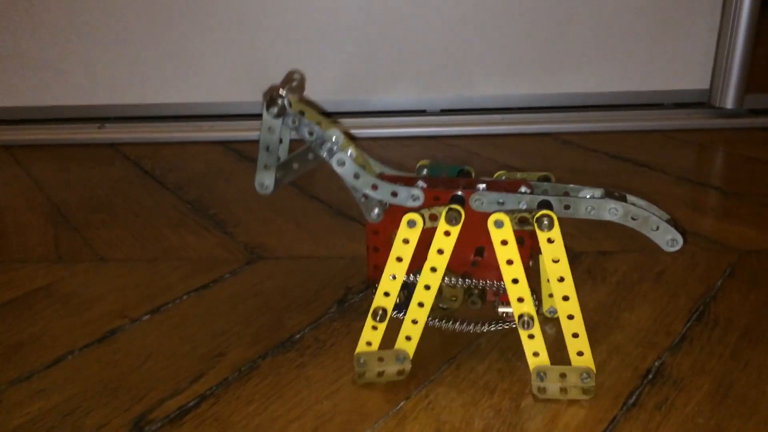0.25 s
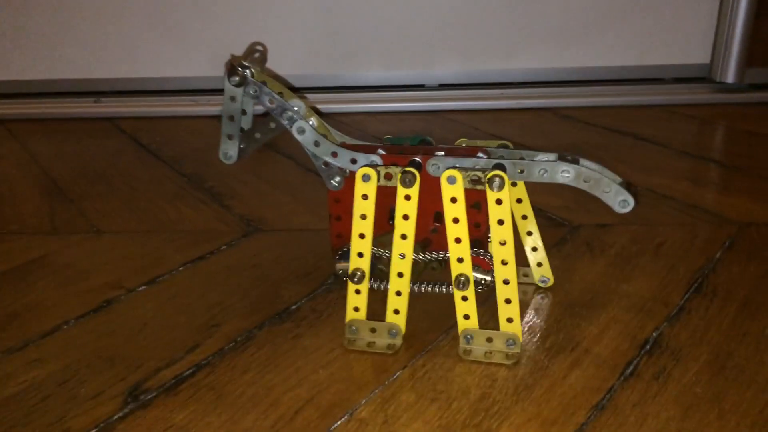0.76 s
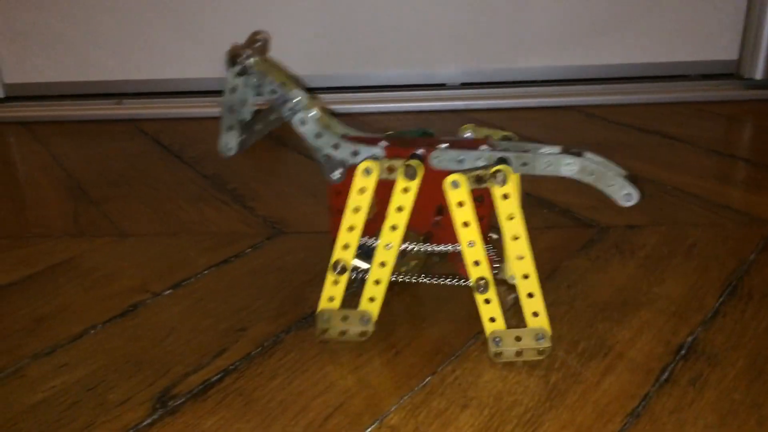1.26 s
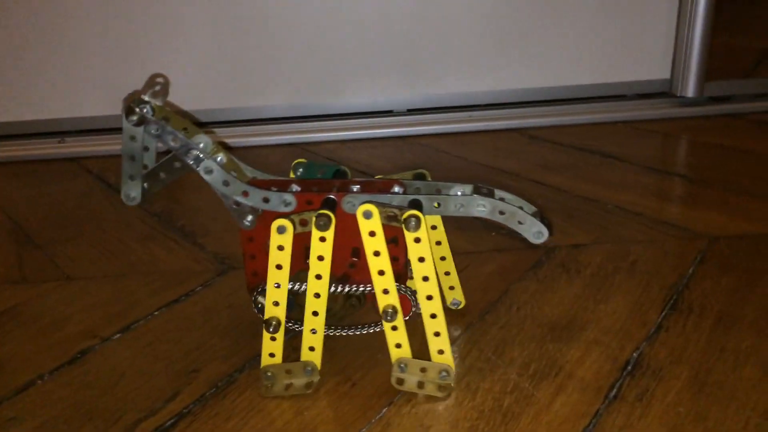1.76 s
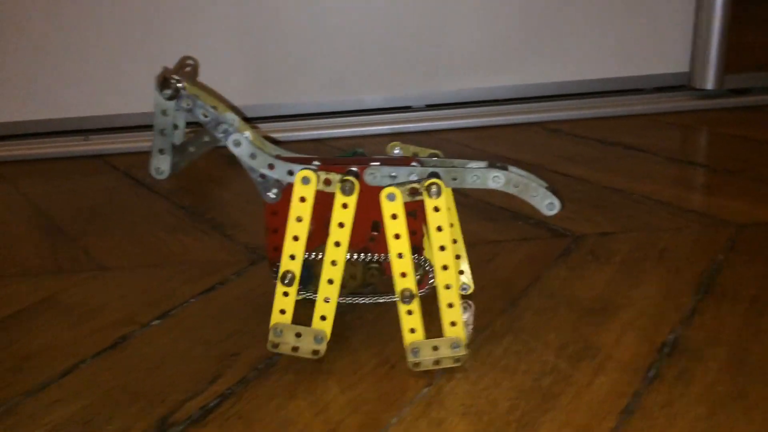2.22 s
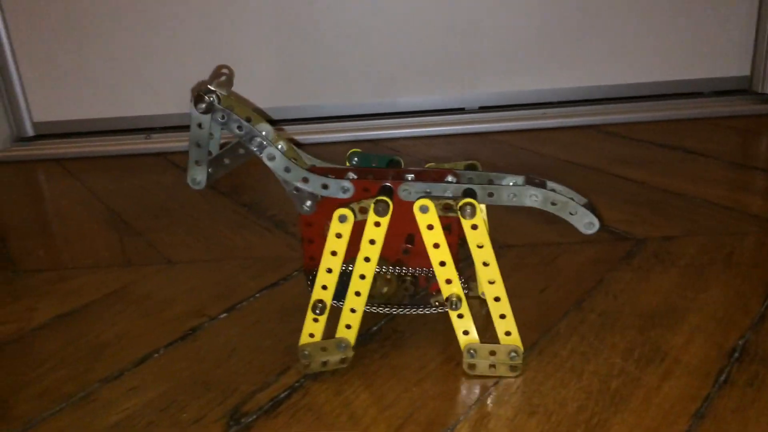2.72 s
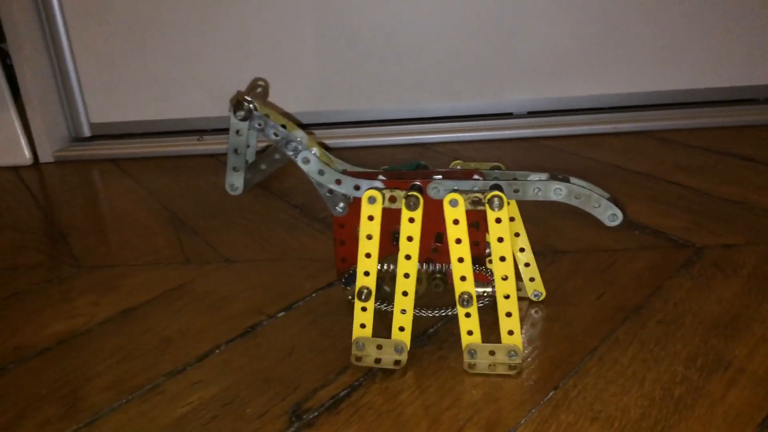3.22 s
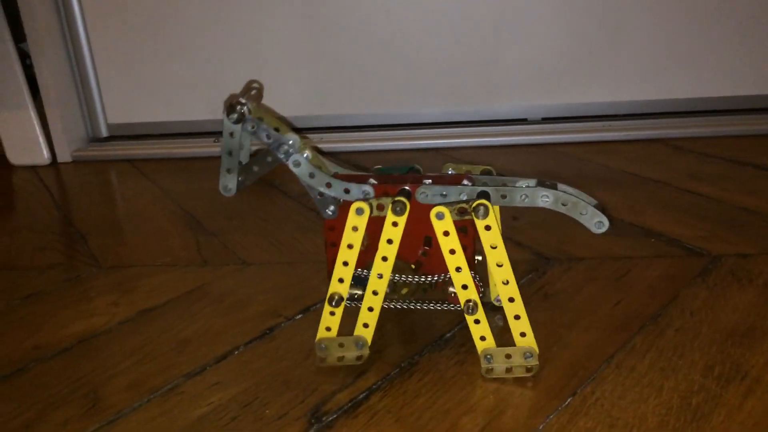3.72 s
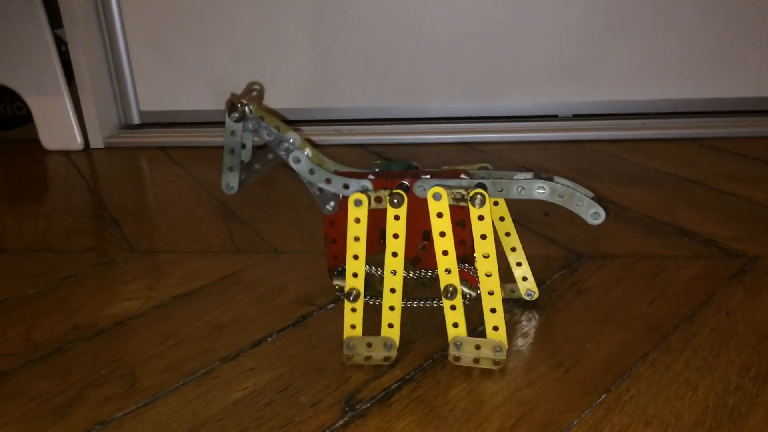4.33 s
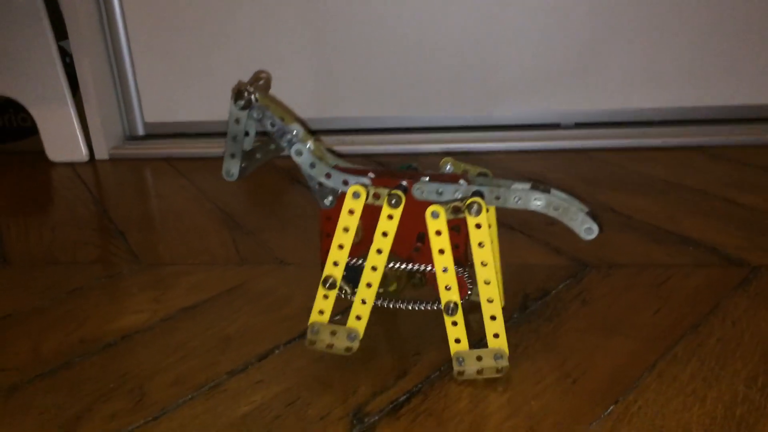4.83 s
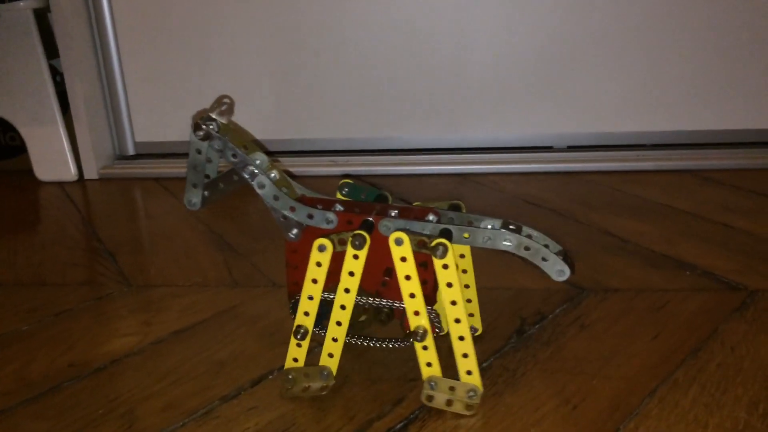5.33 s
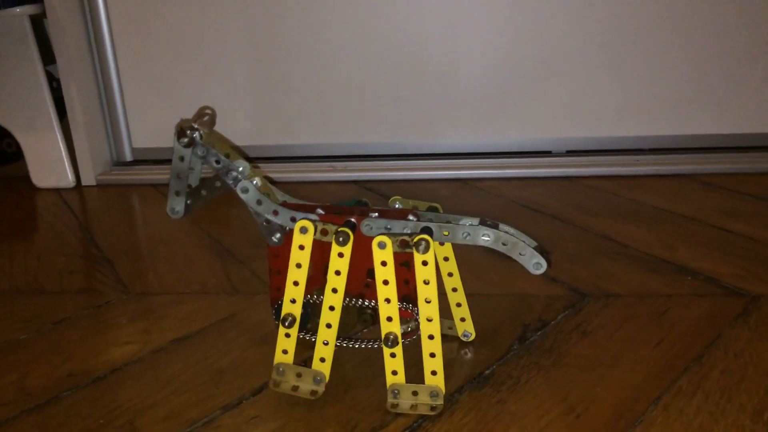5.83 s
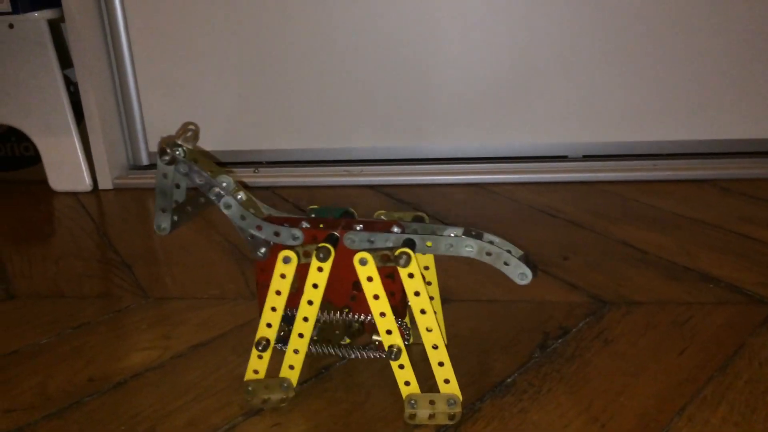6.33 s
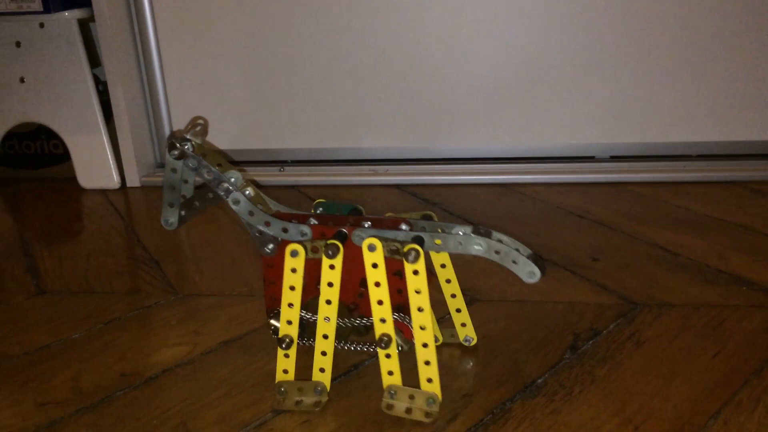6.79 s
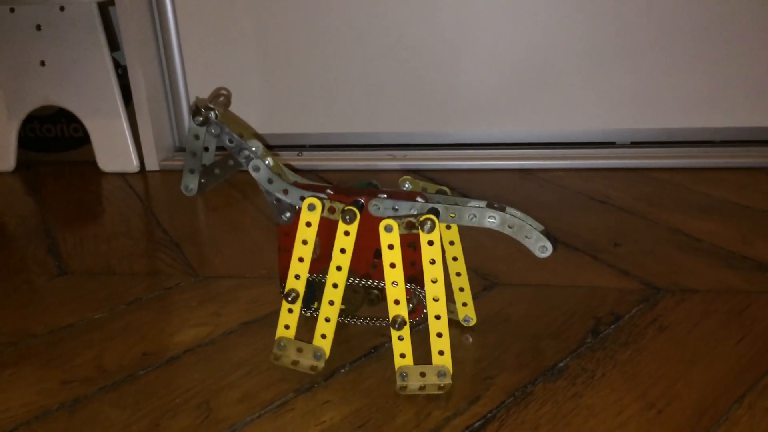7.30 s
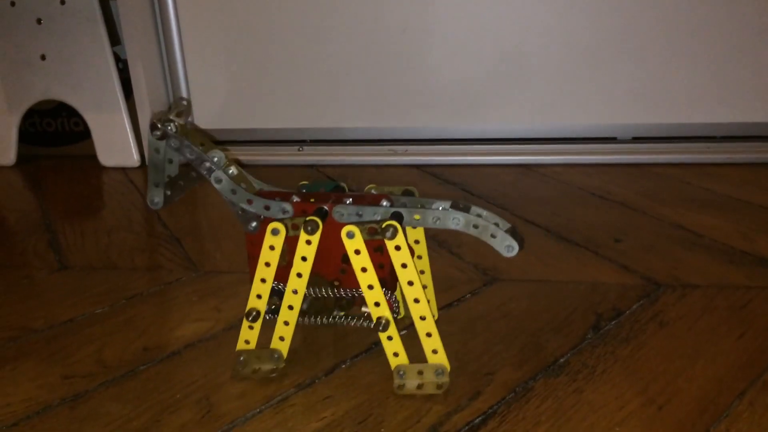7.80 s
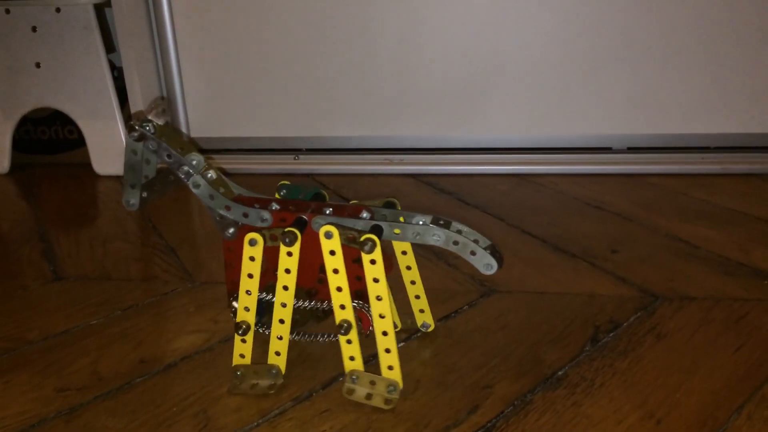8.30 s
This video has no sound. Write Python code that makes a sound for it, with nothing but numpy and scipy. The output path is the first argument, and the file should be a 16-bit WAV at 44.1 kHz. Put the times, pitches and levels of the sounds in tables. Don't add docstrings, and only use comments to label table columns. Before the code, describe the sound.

A wind-up walker of perforated metal strips buzzes and rattles across a wooden floor, paired feet knocking steadily, until its motor nearly stalls into ticks.

```python
import sys
import numpy as np
from scipy import signal
from scipy.fft import rfft, irfft
from scipy.io import wavfile
from scipy.ndimage import uniform_filter1d

SR = 44100
rng = np.random.default_rng(int(sys.argv[2]) if len(sys.argv) > 2 else 0)


def wav_out(sig):
    wavfile.write(sys.argv[1], SR, np.round(np.clip(np.atleast_2d(sig).T, -1, 1) * 32767).astype(np.int16))


def boost_factor(decibels):
    exponent = np.asarray(decibels, float) / 20
    return 10 ** exponent


N = 377055

# landing_s, top_speed_hz, rattle_db, hum_db, hum_lead_s (how long before landing the hum peaks)
STRIDES = [(0.44, 99.4, -32.5, -26, .1), (0.99, 102, -32.5, -25.5, .2), (1.62, 103, -31.5, -28.5, .25),
           (2.17, 98.4, -32, -27, .25), (2.83, 96.1, -33.5, -29, .25), (3.38, 96.4, -33.5, -27.5, .25),
           (4.05, 90.1, -32.5, -28, .25), (4.6, 90, -33, -29, .25), (5.29, 92.2, -33.5, -27.5, .2),
           (5.88, 90.7, -33, -27, .24), (6.57, 91, -33.3, -28, .24), (7.17, 87, -34.5, -32, .15),
           (8.03, 88.5, -33.5, -35, .1), (8.7, 88, -35, -33, .1)]
# slowest_s, speed_hz, rattle_db, hum_db
SLUMPS = [(-0.03, 79, -37, -40), (0.56, 84.8, -37.5, -33.5), (1.16, 84, -38.5, -41), (1.72, 84, -38, -35),
          (2.34, 83.2, -40, -38), (2.96, 80.4, -41, -36), (3.6, 78.5, -41.5, -39), (4.19, 79, -41, -39),
          (4.92, 79.2, -42, -43), (5.43, 81, -43, -40), (6.1, 77, -43, -50), (6.73, 77.4, -42.5, -47),
          (7.38, 82.8, -52, -48), (7.53, 68, -62, -68), (7.76, 64, -46.5, -60), (8.19, 63.8, -54, -70),
          (8.31, 66, -51, -62), (8.38, 69, -45, -56), (8.45, 73, -40.5, -48)]
# time_s, leg_strips_db, second_order_db, side_plates_db, low_hiss_db
HEADING = [(0.0, -47, -38, 0.0, 3.0), (0.8, -48, -40, 0.0, .5), (2.0, -47, -40, 1.5, 1.5),
           (2.9, -53, -41, -1.5, 0.0), (4.0, -48, -37, -.7, 1.0), (4.6, -43, -39, 1.0, -.5),
           (6.3, -42, -30.5, 2.5, -1.0), (7.2, -43, -33, 1.2, -2.0), (8.55, -41, -36, 0.0, -1.0)]
# start_s, peak_db
SLIPS = [(3.043, -22), (3.1236, -20), (3.6321, -20), (3.6896, -28), (3.75, -19), (4.2044, -24),
         (4.4514, -20), (4.9032, -17), (4.9595, -20), (6.0327, -15.5), (6.0839, -25), (6.1619, -21),
         (6.2005, -17), (6.6653, -21), (6.7156, -19), (6.774, -15.5), (6.8576, -19.5)]
# start_s, peak_db, brightness_db
TICKS = [(7.2401, -16.5, -0.5), (7.2774, -22, -1), (7.3152, -17.5, -8), (7.3382, -23, -1),
         (7.3464, -12.5, -4), (7.4004, -23, -6), (7.4147, -21.5, -4), (7.431, -16.5, -8), (7.4684, -23, -3),
         (7.4944, -14, -5), (7.5617, -21, -4), (7.5794, -30, -3), (7.5981, -19.5, -7), (7.643, -31, -8),
         (7.6573, -16.5, -3), (7.6714, -22, -4), (7.7336, -23, -3), (8.1184, -21, -2), (8.1514, -21.5, -4),
         (8.2174, -22, -2), (8.2402, -13, -3), (8.2737, -20, -5), (8.3295, -22, -4), (8.3499, -21, -4),
         (8.393, -20, -1), (8.412, -23, -3), (8.428, -24, -3)]
FULL_RATTLE_DB = -33


def rms_one(x):
    return x / np.sqrt(np.mean(x ** 2) + 1e-20)


def in_time(rows):
    s, *columns = np.transpose(rows)
    return [np.interp(np.arange(N) / SR, s, column) for column in columns]


def drift(rate):
    step = 40
    r = np.exp(-2 * np.pi * rate * step / SR)
    noise = rng.standard_normal(N // step + 2002)
    slow = signal.lfilter([1], [1, -2 * r, r * r], noise)[2000:]
    return np.interp(np.arange(N) / step, np.arange(len(slow)), rms_one(slow))


def band(x, low_hz, high_hz):
    return signal.sosfilt(signal.butter(2, [low_hz, high_hz], "band", fs=SR, output="sos"), x)


def colour(sources, spectrum, patchy_db, rate):
    hz, level_db = np.transpose(spectrum)
    edges = hz[0] * 2 ** np.arange(0, np.log2(hz[-1] / hz[0]) + .3, 1 / 3)
    out = 0
    for k, (low, high) in enumerate(zip(edges, edges[1:])):
        mid_db = np.interp(np.log(low * high) / 2, np.log(hz), level_db)
        flicker = boost_factor(mid_db + patchy_db * drift(rate))
        out = out + flicker * band(sources[k % 2], low, high)
    return out


def resonance(x, hz, width):
    r = np.exp(-np.pi * width / SR)
    gain = (1 - r * r) / 2
    return signal.lfilter(np.array([1, 0, -1]) * gain, [1, -2 * r * np.cos(2 * np.pi * hz / SR), r * r], x)


def bursts(times, peaks, rises, lengths):
    out = np.zeros(N)
    for s, peak, rise, length in np.broadcast(times, peaks, rises, lengths):
        start = round(s * SR)
        t = np.arange(min(N - start, round(SR * length))) / SR
        swell = (1 - np.exp(-t / rise)) ** 2
        out[start:start + len(t)] += peak * swell * boost_factor(-60 * t / length)
    return out


def grains(per_s, spread_db):
    sizes = boost_factor(spread_db * np.minimum(rng.exponential(1, (2, N)), 4))
    sizes = sizes * rng.choice([-1, 1], (2, N))
    return rms_one(sizes * (rng.random((2, N)) < per_s / SR))


def joined(*envelopes, room_db):
    power = sum(e ** 2 for e in envelopes)
    r = boost_factor(-120 / (0.19 * SR))
    linger = signal.lfilter([1 - r], [1, -r], power)
    return np.sqrt(power + boost_factor(room_db) ** 2 * linger)


def cycle(*knots, early_s=0):
    s, value = np.concatenate(knots, axis=1)
    order = np.argsort(s)
    return np.interp(np.arange(N) / SR + early_s, s[order], value[order])


def effort(early_s=0):
    landing_drop_db = [6.3, 3.2]
    full_early_s, drop_s, weaker_spring_db_per_s = .135, .07, .6
    land, _, top_db, _, _ = np.transpose(STRIDES)
    slump, _, low_db, _ = np.transpose(SLUMPS)
    dropped = top_db - np.resize(landing_drop_db, len(land)) - weaker_spring_db_per_s * land
    next_low_db = low_db[np.searchsorted(slump, land[:-1])]
    dropped = np.maximum(dropped[:-1], next_low_db)
    rattle_db = cycle((slump, low_db), (land - full_early_s, top_db), (land, top_db),
                      (land[:-1] + drop_s, dropped), early_s=early_s)
    return rattle_db - FULL_RATTLE_DB


def motor():
    top_early_s, landing_loss_hz, hum_sag_db_per_s = .06, 3.0, 22
    land, top_hz, _, top_db, lead = np.transpose(STRIDES)
    slump, low_hz, _, low_db = np.transpose(SLUMPS)
    hz = cycle((slump, low_hz), (land - top_early_s, top_hz), (land, top_hz - landing_loss_hz))
    hum_db = cycle((slump, low_db), (land - lead, top_db), (land, top_db - hum_sag_db_per_s * lead))
    favour = 1 / (1 + ((hz - 85.4) / 3.3) ** 2)
    detuned_db = 21 * (1 - favour)
    return hz, hum_db, in_time(HEADING)[1] - detuned_db + .15 * effort()


def governor():
    hz, hum_db, second_db = motor()
    turn = 2 * np.pi * np.cumsum(hz * (1 + .013 * drift(10.2))) / SR
    hum = boost_factor(hum_db + 2.0 * drift(17)) * np.sin(turn)
    hum = hum + boost_factor(second_db + 2.86 * drift(15.5)) * np.sin(2 * turn + 0.87)
    return np.sqrt(2) * hum, turn


def strips(contacts):
    # pitch_hz, width_hz, level_db
    strip_tones = [(3080, 160, 6.5), (3300, 150, 5.5), (3860, 250, -1), (5820, 1400, -1), (7970, 500, -2),
                   (9760, 1500, 1), (13650, 3600, -1.5)]
    # pitch_hz, level_db (per Hz)
    rattle_spectrum = [(1600, -32), (2200, -0.5), (2700, -5), (4400, -1.5), (6600, -4), (8300, -5),
                       (9000, -4.5), (11800, -0.5), (15000, -3)]
    # edge_hz, blend_hz
    splits = [(1500, 300), (1950, 150), (2450, 250), (6950, 900), (8600, 30), (11300, 60), (15200, 120),
              (15750, 30)]
    # time_s, level_db
    flank = [(0.0, 1.0), (2.6, 1.0), (3.0, -4.0), (4.15, -4.0), (4.4, 1.5), (5.9, 1.0), (6.3, -2.0),
             (8.55, -5.0)]
    body = colour(contacts, rattle_spectrum, patchy_db=1.06, rate=24)
    whole = body + boost_factor(1.5) * resonance(body, 2227, 120)
    flank_db = in_time(flank)[0]
    for hz, width, level_db in strip_tones:
        shifting_db = level_db + 2.2 * drift(2.8) + (width < 200) * flank_db
        whole = whole + boost_factor(shifting_db) * resonance(body, hz, width)
    spectrum = rfft(whole)
    hz = np.arange(len(spectrum)) * SR / N
    above = [np.clip((hz - edge) / blend + .5, 0, 1) for edge, blend in splits]
    return [rms_one(irfft(spectrum * (low - high), N)) for low, high in zip(above, above[1:])]


def gear_levels():
    legs_db, _, plates_db, _ = in_time(HEADING)
    return (FULL_RATTLE_DB + effort(),
            legs_db + .85 * effort(),
            FULL_RATTLE_DB - .6 + plates_db + 1.3 * effort(early_s=.025),
            FULL_RATTLE_DB + 2.7 + .98 * effort(early_s=.005))


def catching():
    catch_s, hush_db = .013, 4.5
    marks, width = np.zeros(N), round(catch_s * SR)
    marks[[round((slip[0] - catch_s) * SR) for slip in SLIPS + TICKS]] = width
    smooth = uniform_filter1d(uniform_filter1d(marks, width), width)
    return -hush_db * np.minimum(width * smooth / width, 1)


def gears(turn):
    meshing_db = catching() - 1.5 + 0.91 * np.sin(turn) + 0.58 * drift(37) + 0.59 * drift(86)
    rattle, legs, plates, hiss = (boost_factor(level_db + meshing_db) for level_db in gear_levels())
    s, peak_db, bright_db = np.transpose([(*slip, -4) for slip in SLIPS] + TICKS)
    s = s - .0015
    dull = bursts(s, boost_factor(peak_db - 8), 0.002, 0.032)
    bright = bursts(s, boost_factor(peak_db + bright_db - 9), 0.0014, 0.04)
    foot_s, _, _, clank_db, _, _ = footfalls()
    clank = bursts(foot_s, boost_factor(clank_db - 8.5), 0.0028, 0.072)
    low = joined(rattle, dull, clank, room_db=-8.5)
    high = joined(hiss, bright, 0.72 * clank, room_db=-8.5)
    low_hiss_db = in_time(HEADING)[3] + 1.2 * drift(3.6)
    envelopes = [
        boost_factor(-21.5) * low,
        joined(legs, 0.32 * dull, 0.56 * clank, room_db=-4),
        low,
        joined(plates, 0.58 * bright, 0.65 * clank, room_db=-7),
        boost_factor(-4.5 + low_hiss_db) * high,
        boost_factor(-0.5) * high,
        boost_factor(-22) * high]
    ringing = strips(grains(per_s=9000, spread_db=3.5))
    return sum(envelope * sound for envelope, sound in zip(envelopes, ringing))


def shake():
    upper_db = -44 - 1.9 * np.arange(N) / SR + .3 * effort()
    return -38 + .42 * effort(), upper_db, -55.5 + .22 * effort()


def background():
    # pitch_hz, level_db (per Hz)
    rumble_spectrum = [(13, -55), (22, -20), (55, 0.5), (102, -3.5), (158, -2.5), (187, -19.5), (230, -19),
                       (300, -42), (510, -120)]
    # pitch_hz, level_db (per Hz)
    murmur_spectrum = [(120, -42), (200, 0), (227, -8.5), (514, -17), (756, -13.5), (1560, -17.5),
                       (2000, -21), (2600, -59), (4400, -120)]
    rumble_db, upper_db, murmur_db = shake()
    white = rng.standard_normal((2, N))
    rumble = colour(white, rumble_spectrum, patchy_db=4.5, rate=5.1)
    rumble = rms_one(rumble + 2.8 * resonance(rumble, 114, 25))
    upper = 0
    for hz in [245, 300, 365]:
        mode = resonance(resonance(white[0], hz, 55), hz, 55)
        upper = upper + boost_factor(3 * drift(6)) * mode
    murmur = rms_one(colour(white, murmur_spectrum, patchy_db=2.5, rate=5.3))
    return boost_factor(rumble_db + 4) * rumble + boost_factor(upper_db - 2.0) * rms_one(upper) + boost_factor(murmur_db + 4.5) * murmur


def footfalls():
    # start_s, knock_db, thump_db, pitch_hz
    landings = [(0.411, -26.5, -22.5, 708), (0.444, -20, -25, 675), (0.943, -23, -25, 668),
                (0.992, -19.5, -25, 1400), (1.573, -23.5, -22, 660), (1.616, -15, -40, 1220),
                (2.124, -20.5, -19.5, 773), (2.167, -24.5, -22.5, 1900), (2.786, -26, -22.5, 1103),
                (2.823, -15.5, -22.5, 1274), (3.321, -25, -19.5, 991), (3.358, -25.5, -25, 1878),
                (4.014, -29, -24, 633), (4.044, -31, -26.5, 622), (4.563, -21, -24.5, 596),
                (4.609, -26.5, -27.5, 1285), (5.254, -28.5, -35, 670), (5.292, -20, -20.5, 1270),
                (5.835, -20.5, -25.5, 1288), (5.88, -18, -24.5, 716), (6.526, -27, -45, 1035),
                (6.56, -23.5, -26.5, 978), (7.116, -17.5, -31, 539), (7.16, -18, -21, 1240),
                (8.005, -25.5, -28, 743), (8.033, -21.5, -22, 1267)]
    # start_s, knock_db, thump_db, pitch_hz
    heels = [(0.567, -31.5, -32, 1410), (1.759, -37, -30, 1380), (2.925, -38, -41, 1380),
             (3.497, -39, -32, 1900), (4.141, -36, -31, 770), (4.765, -39.5, -37, 1180),
             (5.376, -36, -40, 615), (6.66, -35.5, -33, 990), (8.16, -31.5, -31.5, 751)]
    s, knock_db, thump_db, pitch_hz = np.transpose(landings + heels)
    clank_db = np.repeat([-24, -36], [len(landings), len(heels)])
    length_s = .066 - .0015 * (knock_db + 24)
    return s, knock_db, thump_db, clank_db, length_s, pitch_hz


def snaps(s, peak_db, pitch_hz):
    out, bounces = np.zeros(N), rng.uniform(0.0039, 0.01, len(s))
    starts = np.round((s + 0.002004) * SR).astype(int)
    for start, peak, hz, bounce in zip(starts, boost_factor(peak_db), pitch_hz, bounces):
        clicks = np.zeros(SR // 20) + 1e-18
        clicks[[0, round(bounce * SR)]] = 1, -.55
        ring = resonance(clicks, hz, 190) + 0.4 * band(clicks, 730, 3600)
        out[start:start + len(ring)] += peak * ring / np.abs(ring).max()
    return out


def board(s, push_db, hz, t60):
    push = np.zeros(N) + 1e-18
    push[np.round(s * SR).astype(int)] = boost_factor(push_db)
    r, w = boost_factor(-60 / (t60 * SR)), 2 * np.pi * hz / SR
    soft_push = resonance(push, hz, 46.4)
    return signal.lfilter([0, np.sin(w)], [1, -2 * r * np.cos(w), r * r], soft_push)


def feet():
    # pitch_hz, level_db (per Hz)
    knock_spectrum = [(200, -5), (300, 0.5), (450, -8), (620, -0.5), (850, -9.5), (1200, -3), (1700, -10.5),
                      (2400, -17)]
    # pitch_hz, level_db, t60_s (time to fall 60 dB)
    board_modes = [(118.4, 2, 0.074), (123.52, -5, 0.078), (163, -4, 0.065), (244, -13.5, 0.12),
                   (290, -12, .08), (313.3, -12, 0.084), (355, -16.5, 0.069)]
    # start_s, push_db
    rocking = [(1.118, -22), (1.691, -31), (1.771, -31), (2.328, -19.5), (3.53, -24), (4.899, -23),
               (6.03, -28), (6.618, -26), (7.487, -39), (7.849, -47)]
    s, knock_db, thump_db, _, length, pitch_hz = footfalls()
    chatter = grains(per_s=4000, spread_db=2.0)
    wood = rms_one(colour(chatter, knock_spectrum, patchy_db=5.0, rate=14))
    for start, hz in zip(np.round(s * SR).astype(int), pitch_hz):
        span = slice(start, start + SR // 10)
        wood[span] += boost_factor(-5) * rms_one(resonance(chatter[0, span], hz, 133))
    tail = bursts(s, boost_factor(knock_db - 3.5), 0.0029, np.clip(length, .02, .2))
    out = wood * joined(tail, room_db=-11.5) * boost_factor(2.5 * drift(113.1))
    out += snaps(s, knock_db + 1.0, pitch_hz)
    luck = rng.normal(0, 2.5, (len(s), len(board_modes)))
    for (hz, level_db, t60), luck_db in zip(board_modes, luck.T):
        out += board(s, thump_db + level_db + luck_db + 7, hz, t60)
    rock_s, rock_db = np.transpose(rocking)
    return out + board(rock_s, rock_db + 2.5, 117.7, 0.095)


def room(x):
    dull = signal.lfilter([.4], [1, -.6], x)
    return boost_factor(-8) * sum(np.roll(dull, round(lag_s * SR)) for lag_s in [.0063, .0171])


def scene():
    hum, turn = governor()
    steps = feet()
    return (hum + gears(turn) + background() + steps + room(steps))[None]


def top_cut(x):
    return signal.sosfilt(signal.butter(12, 16520, fs=SR, output="sos"), x)


def record(dry):
    dry = signal.sosfilt(signal.butter(2, 20, "high", fs=SR, output="sos"), dry)
    dry = signal.sosfilt(signal.ellip(9, .3, 40, 15750, fs=SR, output="sos"), dry)
    return top_cut(dry)


dry = scene()
out = record(dry)
wav_out(out)
```